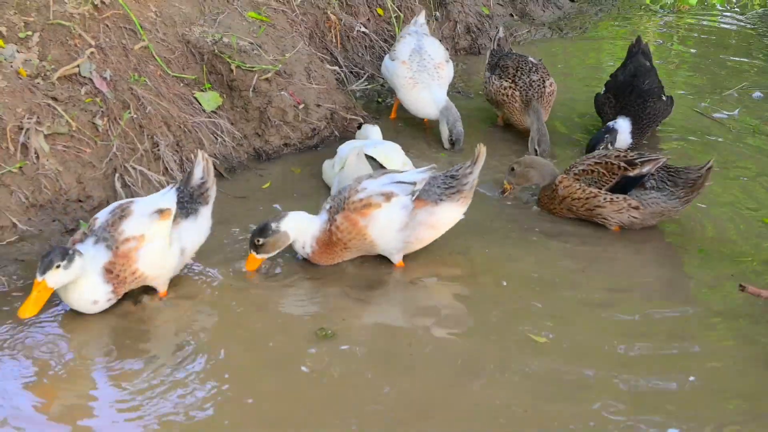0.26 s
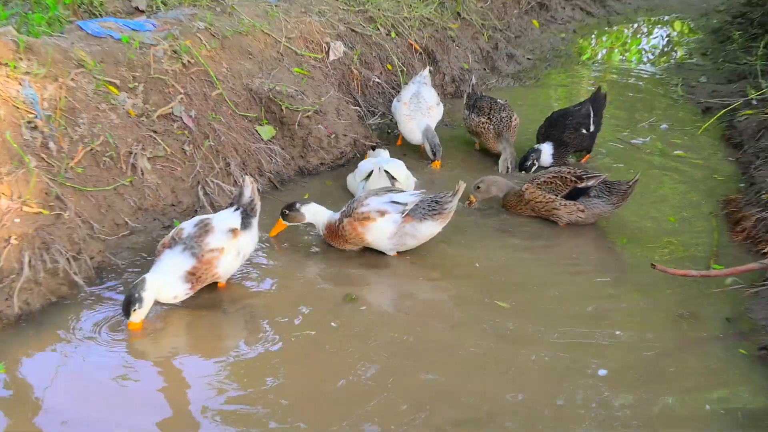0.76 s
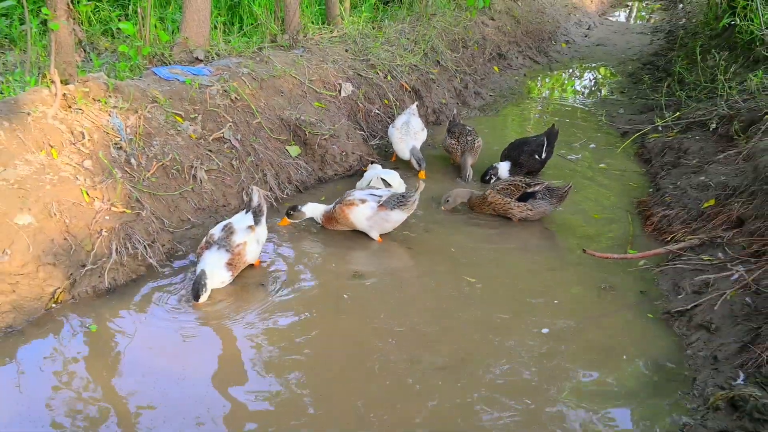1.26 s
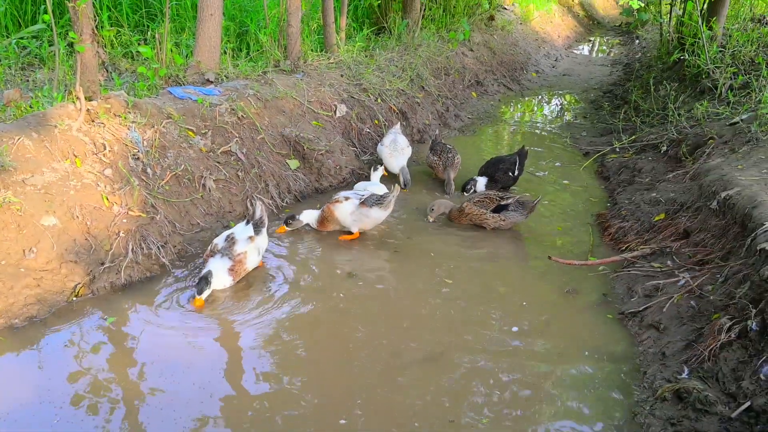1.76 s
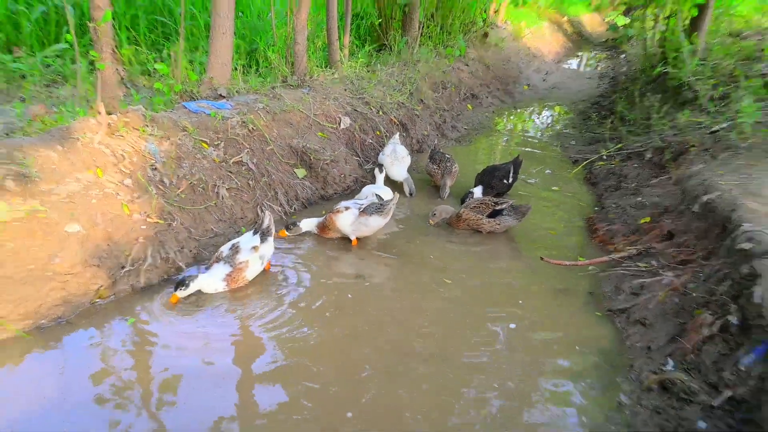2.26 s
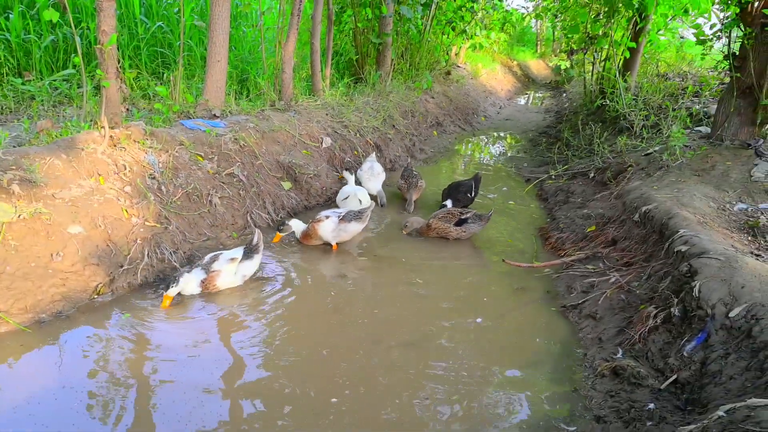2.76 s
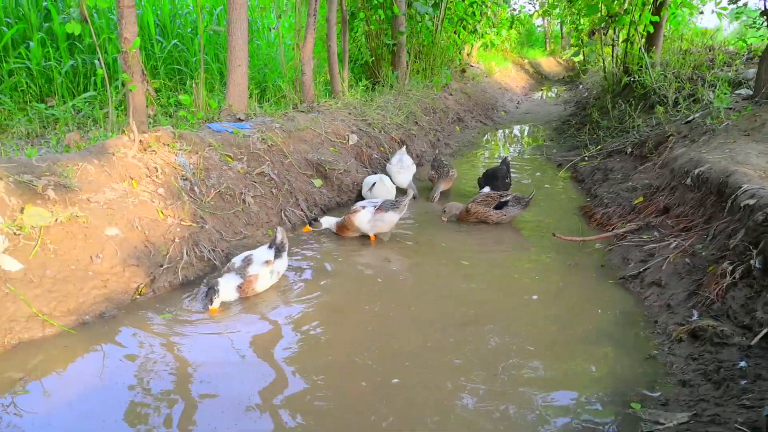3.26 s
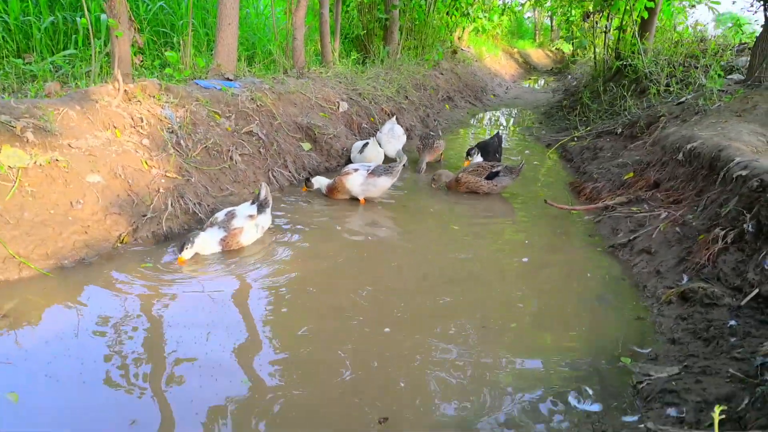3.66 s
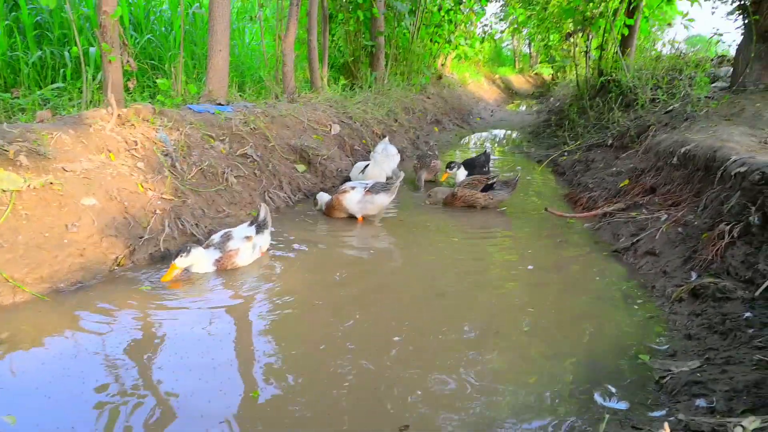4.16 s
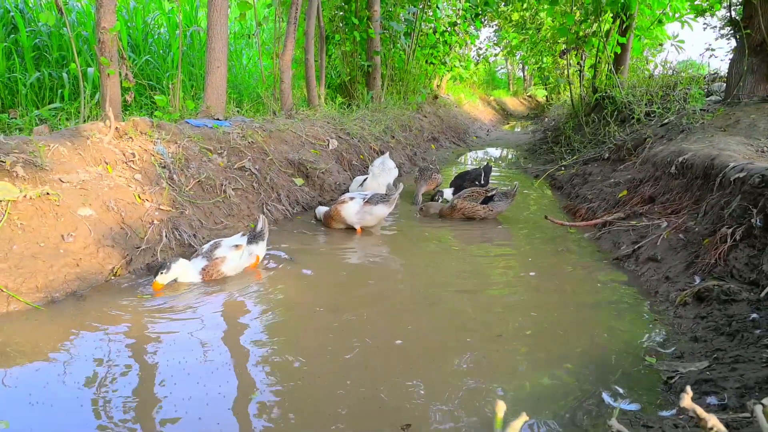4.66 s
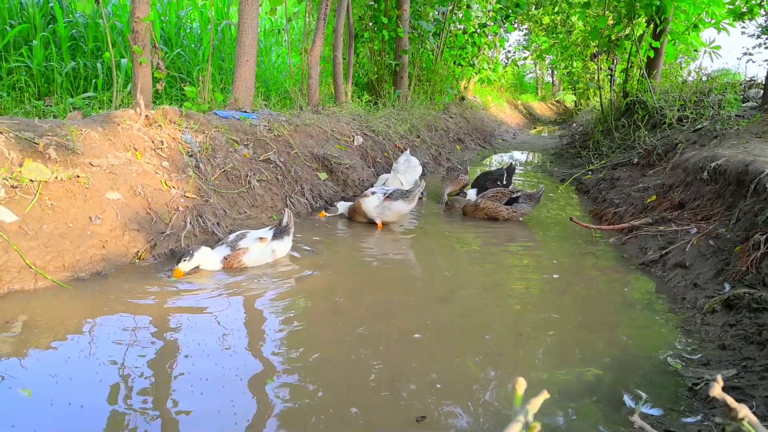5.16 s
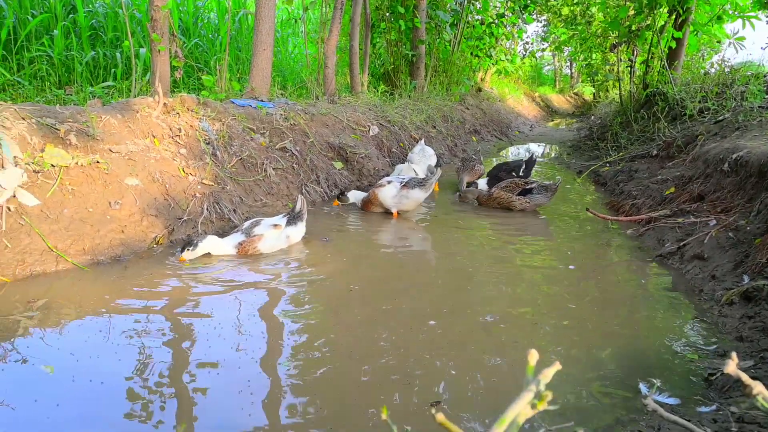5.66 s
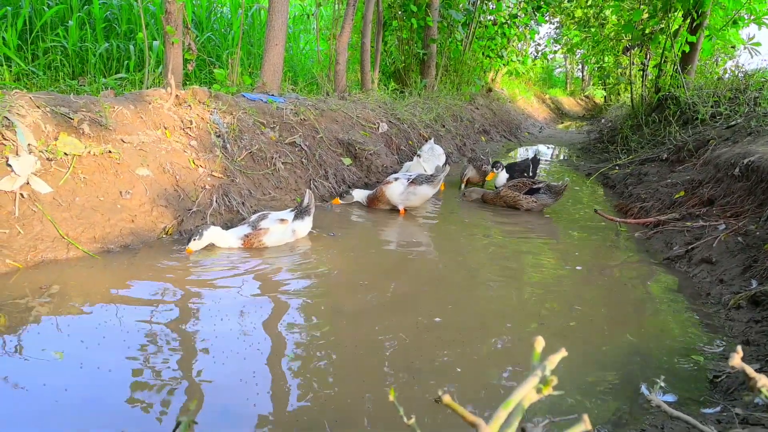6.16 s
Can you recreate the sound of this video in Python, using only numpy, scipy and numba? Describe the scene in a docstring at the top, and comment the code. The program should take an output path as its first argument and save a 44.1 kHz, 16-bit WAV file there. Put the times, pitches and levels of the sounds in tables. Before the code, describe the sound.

Outdoors beside a muddy ditch, heard in stereo by a phone a few metres from dabbling ducks. From the start, small birds chirp several times a second, quick falling notes and thin rising whistles, louder on the right and softened by short echoes. Water gurgles gently, swelling around 0.6-1.1 s with bill ticks and a plop. A cricket throbs faintly from 0.3 to 1 s, and cicadas shimmer high over a faint distant engine that fades after about 3 s. After a lull, a sharp cluster of ticks, plops and spray comes at 2.3-2.6 s. A crackling splash breaks at 3.7 s, then one duck quacks very faintly and sags away from 4.3 s. Water is quieter around 5-6 s, while arched chirps continue and the cricket returns weakly at 5.6 s. From 6.2 s, another splash, bright ticks and plops close the scene.

```python
"""Ducks dabble in a muddy ditch a few metres from a phone: bills tick, bubbles plop, water sloshes.
Water sounds are many short ringing tones (bubbles, drops) and small bursts of noise (ticks).
Small birds, louder on the right, chirp and whistle in gliding tones blurred by echoes.
Cicadas (narrow noise) and a cricket (a throbbing tone) sing far off, over a distant engine and leaves.
Later, sheets of water crackle up and one duck quacks faintly, in a few overtones."""
import sys
import numpy as np
from scipy import signal
from scipy.io import wavfile
from scipy.ndimage import uniform_filter1d
from numba import njit

SR = 44100
rng = np.random.default_rng(int(sys.argv[2]) if len(sys.argv) > 2 else 0)


def put_to_file(sound):
    """Save the sound as 16-bit audio at rate SR, in the file named by the first command-line argument."""
    columns = np.atleast_2d(sound).T  # one column per channel
    safe = np.clip(columns, -1, 1)
    whole_steps = np.round(safe * 32767)
    wavfile.write(sys.argv[1], SR, whole_steps.astype(np.int16))


N = 282681
T = np.arange(N) / SR
PORT_LAG = 6  # samples by which the left port hears the birds late
DUCK_PAN_DB = -2  # left minus right


def undb(db):
    """Turn decibels into a plain amplitude factor."""
    return 10 ** (np.asarray(db) / 20)


def level(x, db):
    """Scale a sound so its average (RMS) level is db."""
    return x * undb(db) / np.sqrt(np.mean(x ** 2))


def curve(table):
    """Join the points of each table column with straight lines over time."""
    s, *columns = np.transpose(table)
    return [np.interp(T, s, c) for c in columns]


def band(x, lo_hz, hi_hz, order=2):
    """Keep only the pitches between two limits."""
    edges = [lo_hz, min(hi_hz, .45 * SR)]
    return signal.sosfilt(signal.butter(order, edges, "band", fs=SR, output="sos"), x)


def walk(rate):
    """A random level that slides to a new value rate times a second, with a spread near 1."""
    k = int(SR / rate)
    held = np.repeat(rng.standard_normal(N // k + 1), k)
    return uniform_filter1d(held, k)[:N]


def fade(t, t60):
    """Die away by 60 dB in t60 seconds."""
    return np.exp(-np.log(1000) * t / t60)


def add(out, s, x):
    """Mix a short sound into out at s seconds."""
    i = int(s * SR)
    out[i:i + len(x)] += x[:N - i]


@njit
def grains(start, hz, cycles, size, glide, count):
    """Sines that swell for three cycles and decay, the pitch climbing by the share glide over the ring."""
    out = np.zeros(count)
    for k in range(len(start)):
        n, phase = int(3 * cycles[k] / hz[k] * SR), 0.
        for i in range(min(n, count - start[k])):
            phase += 2 * np.pi * hz[k] * (1 + glide * i / n) / SR
            swell = np.sin(np.pi / 2 * min(1., i * hz[k] / SR / 3)) ** 2
            out[start[k] + i] += size[k] * np.sin(phase) * np.exp(-7 * i / n) * swell
    return out


def place(x, pan_db, wet_db, t60, rise_s, lag=0):
    """Direct sound at two ports, plus scattered echoes whose pattern shifts as the animals move."""
    t, wet = np.arange(int(.35 * SR)) / SR, 0
    # two echo patterns take turns, three rounds a second
    for share in (np.cos, np.sin):
        spikes = np.prod(rng.standard_normal((2, 2, len(t))), axis=0)
        echo = spikes * fade(t, t60) * np.minimum(t / rise_s, 1)
        # low echoes are alike at both ports
        echo[1] = band(echo[0], 17.0, 760, order=1) + band(echo[1], 710, 20000, order=1)
        echo /= np.sqrt(np.sum(echo ** 2, axis=1))[:, None]
        turned = x * share(2 * np.pi * 3 * T)
        wet = wet + signal.oaconvolve(turned[None], echo, axes=1)[:, :N]
    direct = np.array([np.roll(x, lag), x])
    balance = undb(np.reshape([pan_db, -pan_db], (2, -1)) / 2)
    return (direct + undb(wet_db) * wet) * balance


# stirred water, before random surges and echoes: [t/s, slosh level/dB, spray level/dB], levels relative
STIRRED_WATER = [(0, -65, -76.5), (.25, -69, -81), (.62, -58.5, -68), (1., -64, -64.5), (1.55, -66, -78.5),
                 (1.72, -70.5, -86), (2.15, -77, -83), (2.42, -61, -56), (2.6, -68, -68), (2.95, -73, -95),
                 (3.58, -77.5, -77), (3.78, -66, -67), (4.08, -79.5, -68.5), (4.4, -61.5, -76),
                 (4.95, -82.5, -69.5), (5.6, -100, -84.5), (6.14, -77.5, -70.5), (6.41, -57.5, -63)]
# bubble size changes as the mud is worked: [t/s, typical f/Hz]
BUBBLE_PITCH = [(0, 1377), (.7, 1610), (1.4, 1594), (2.9, 1145), (4.4, 1450), (4.8, 834), (6.41, 1355)]


def slosh():
    """Many small bubbles ring in the churned mud, with fine spray crackling above them."""
    slosh_db, spray_db = curve(STIRRED_WATER)
    when, size = rng.random((7000, 2)).T
    start = (when * N).astype(int)
    hz = curve(BUBBLE_PITCH)[0][start] * np.exp(0.333 * rng.standard_normal(len(when)))
    loud = hz * undb(np.minimum(-3.5 * np.log(size), 13.))  # few are big
    bubbles = grains(start, hz, np.full(len(hz), 6.55), loud, 0.27, N)

    when, pitch, size = rng.random((20000, 3)).T
    drop_db = np.minimum(-3.8 * np.log(size), 21.) + 9. * pitch
    drop_hz = 2500 * 6.6 ** pitch
    spray = grains((when * N).astype(int), drop_hz, np.full(len(pitch), 2.5), undb(drop_db), 0., N)

    wavelets = level(band(rng.standard_normal(N), 297, 790), -19.)  # they lap underneath
    water = level(bubbles, 2.5) + wavelets
    wash = water * undb(slosh_db + 2.2 * walk(12))
    wash = wash + level(spray, 1.7) * undb(spray_db + 7.4 * walk(14))
    return place(wash, DUCK_PAN_DB, wet_db=1.0, t60=0.088, rise_s=0.00078, lag=PORT_LAG // 2)


# lower and higher cicada chorus, before random flicker: [t/s, level/dB]
LOW_CICADAS = [(0, -63.5), (3, -70), (6.41, -70)]
HIGH_CICADAS = [(0, -61), (1.15, -81), (1.6, -71.5), (2.1, -86), (2.85, -64), (3.6, -79), (4.4, -66.5),
                (5.3, -79), (6.41, -71)]


def cicadas():
    """Each chorus is narrow noise about a centre pitch that sways every 1.6 s."""
    out = np.zeros((2, N))
    for table, hz, sway_hz, width_hz in [(LOW_CICADAS, 7740, 150, 380), (HIGH_CICADAS, 10290, 60, 330)]:
        phase = 2 * np.pi * np.cumsum(hz - sway_hz * np.cos(2 * np.pi * T / 1.6)) / SR
        lowpass = signal.butter(4, width_hz, fs=SR, output="sos")
        for side in out:
            swing = signal.sosfilt(lowpass, rng.standard_normal((2, N)))
            chorus = swing[0] * np.cos(phase) + swing[1] * np.sin(phase)
            side += level(chorus, 0) * undb(curve(table)[0] + 5.2 * walk(19))
    return out


# a far engine, the whine before random flicker: [t/s, rumble level/dB, whine level/dB]
ENGINE = [(0, -74.5, -81.5), (.8, -71, -80), (1.5, -82.5, -85), (2.4, -73, -95.5), (3.3, -87, -93.5),
          (6.41, -83, -95)]


def engine():
    """A far engine: low rumbling noise and a steady 393 Hz whine."""
    rumble_db, whine_db = curve(ENGINE)
    whine = np.sqrt(2) * np.sin(2 * np.pi * 393 * T) * undb(whine_db + 2.2 * walk(16))
    rumble = level(band(rng.standard_normal(N), 73.8, 99, order=1), 0) * undb(rumble_db)
    return rumble + whine


# tone balance of the background: [f/Hz, relative level/dB per Hz]
AIR_BALANCE = [(25, -10.5), (87, -3.5), (2000, -27), (3430, -1.5), (4490, -17), (7710, -14.5), (10400, -42),
               (16000, -50)]
AIR_DB = -69  # average level of the whole background


def air():
    """Distant rumble and leaves: noise in half-octave bands, the bass more alike at both ports."""
    out, swell, (f, density_db) = 0, walk(0.86), np.transpose(AIR_BALANCE)
    for hz in 30 * 2 ** np.arange(0, 9.1, .5):
        mid, side = band(rng.standard_normal((2, N)), hz / 1.19, hz * 1.19, order=1)
        db = np.interp(np.log(hz), np.log(f), density_db) + 1.1 * swell + 5.6 * walk(2.026)
        width = np.clip(hz / 1200, .2, 1)
        out = out + undb(db) * (mid + width * side * np.array([[1], [-1]]))
    return level(out, AIR_DB)


FALL_BEND = 1.6  # above 1 the glide after the knee gathers speed


def note(out, s, length, hz, knee, peak, db, warble):
    """A sine gliding through three pitches with a quick uneven warble, loudest at the share peak."""
    u = np.linspace(0, 1, int(length * SR))
    late = np.maximum(u - knee, 0) / (1 - knee)
    bent = np.minimum(u, knee) + (1 - knee) * late ** FALL_BEND
    wobble = uniform_filter1d(np.repeat(rng.standard_normal(60), 150), size=150)[:len(u)]
    glide = uniform_filter1d(np.interp(bent, [0, knee, 1], hz), size=300)
    pitch = glide * (1 + warble * wobble)
    swell = np.interp(u, [0, peak, 1], [0, 1, 0])
    shape = .45 * np.sqrt(swell) + swell ** 3  # a thin lead-in and a bright core
    add(out, s, 2 * undb(db) * shape * np.sin(2 * np.pi * np.cumsum(pitch) / SR))


# falling chirps: [t/s, length/s, knee f/Hz, end f/Hz, relative level/dB]
FALLING_CHIRPS = [(0.109, 0.094, 3320, 2070, -42.5), (0.167, 0.08, 3363, 2284, -48.5),
                  (0.443, 0.11, 3500, 2020, -47), (0.496, 0.097, 3434, 2164, -46),
                  (0.837, .11, 3505, 3050, -44), (0.841, 0.031, 2576, 2210, -47.5),
                  (1.097, 0.064, 2990, 1860, -52.5), (1.16, 0.11, 3546, 2190, -50),
                  (1.358, 0.12, 3186, 2150, -50.5), (1.481, 0.087, 3240, 2640, -56.5),
                  (1.538, 0.086, 3470, 3100, -59), (0.65, 0.062, 3700, 3120, -66),
                  (1.762, 0.065, 3360, 2280, -49.5), (1.835, 0.056, 3000, 2160, -50),
                  (1.889, 0.075, 3666, 3080, -49), (2.052, 0.083, 3534, 3050, -55),
                  (2.147, 0.065, 3613, 2200, -47), (2.433, 0.054, 3380, 3000, -53),
                  (2.614, 0.065, 3760, 2400, -53), (2.665, .12, 3210, 3050, -52.5),
                  (2.775, 0.042, 3290, 2610, -49), (2.847, 0.055, 3540, 3040, -50.5),
                  (3.077, 0.07, 3080, 2080, -55), (3.136, 0.087, 3494, 2640, -53),
                  (3.217, 0.073, 3300, 2260, -55.5), (3.398, 0.092, 3496, 1900, -51),
                  (3.713, 0.058, 3390, 2510, -46.5), (3.868, 0.072, 3950, 3180, -61),
                  (4.012, 0.073, 3350, 2250, -50), (4.078, 0.064, 3897, 3600, -60),
                  (4.164, .06, 3640, 3190, -60), (4.341, .13, 3380, 2430, -50.5),
                  (4.665, 0.12, 3638, 2390, -49.5), (4.98, 0.05, 2980, 2370, -55.5),
                  (5.031, .14, 3667, 3110, -51), (5.212, 0.045, 3580, 2830, -49),
                  (5.42, 0.091, 3660, 2730, -53.5), (5.694, 0.097, 3647, 2940, -51.5),
                  (5.958, 0.091, 3515, 2050, -50.5), (6.258, 0.035, 3330, 2980, -54)]
# arched chirps, up and then down: [t/s, top f/Hz, relative level/dB]
ARCHED_CHIRPS = [(0.253, 4090, -58.5), (0.575, 4110, -52), (0.826, 4120, -51), (2.229, 4235, -59.5),
                 (4.797, 3770, -59), (5.317, 3910, -49.5), (5.574, 3854, -47), (5.821, 3845, -49.5),
                 (6.09, 3810, -50.5)]
# the phone turns slowly: [t/s, left minus right level/dB]
BIRD_PAN = [(0, -6.5), (3., -7), (6.41, -5.5)]
CHIRP_START = 1.1  # start pitch over knee pitch
CHIRP_KNEE, CHIRP_PEAK = .6, 0.78  # shares of the length
UPPER_VOICE, UPPER_VOICE_DB = 1.12, -11.5  # second half of the syrinx: pitch ratio, level
ARCH_S, ARCH_TOP = 0.1, 0.46  # length; where the top comes, as a share of it


def chirps():
    """Two-voiced chirps hold and drop, others arch; all flutter, and a few trunks repeat them plainly."""
    falls = np.zeros(N)
    for s, length, knee_hz, end_hz, db in FALLING_CHIRPS:
        lower = [CHIRP_START * knee_hz, knee_hz, end_hz]
        upper = UPPER_VOICE * np.array([knee_hz, knee_hz, end_hz])
        note(falls, s, length, lower, CHIRP_KNEE, CHIRP_PEAK, db, 0.0097)
        note(falls, s, length, upper, CHIRP_KNEE, CHIRP_KNEE, db + UPPER_VOICE_DB, 0.017)
    for s, top_hz, db in ARCHED_CHIRPS:
        note(falls, s, ARCH_S, top_hz * np.array([.83, 0.99, .64]), ARCH_TOP, 0.62, db, 0.01)
    falls = falls * undb(6.5 * walk(200))
    repeats = sum(undb(db) * np.roll(falls, int(s * SR)) for s, db in [(.024, -9), (.049, -11)])
    pan_db = curve(BIRD_PAN)[0]
    return place(falls + repeats, pan_db, wet_db=-3.5, t60=0.2, rise_s=0.005, lag=PORT_LAG)


# rising whistles: [t/s, length/s, held f/Hz, relative level/dB]
RISING_WHISTLES = [(0.12, 0.071, 4930, -51.5), (0.693, 0.087, 5470, -56.5), (0.78, 0.12, 5110, -50),
                   (1.225, 0.034, 1890, -51), (1.375, 0.026, 1870, -54.5), (2.775, 0.092, 5000, -57),
                   (3.206, 0.065, 5315, -58.5), (3.285, 0.072, 5230, -50), (3.644, 0.085, 5020, -49.5),
                   (4.435, 0.07, 4835, -52), (4.918, 0.081, 4780, -51), (5.865, 0.057, 5530, -58.5),
                   (5.96, 0.077, 5250, -52)]
WHISTLE_KNEE = .62  # share of the length where the climb levels off


def whistles():
    """Bird whistles climb, level off and flutter lightly."""
    rises = np.zeros(N)
    for s, length, held_hz, db in RISING_WHISTLES:
        note(rises, s, length, held_hz * np.array([.82, 1., 1.02]), WHISTLE_KNEE, 0.43, db, 0.0245)
    rises = rises * undb(0.63 * walk(300))
    return place(rises, -0.11, wet_db=0.68, t60=0.29, rise_s=0.016, lag=PORT_LAG)


# cricket songs: [start t/s, end t/s, level/dB before fades and echoes]
CRICKET_SONGS = [(0.307, 1.022, -63.5), (5.618, 6, -69)]


def cricket():
    """A steady high tone above a rasp of noise, throbbing about 58 times a second."""
    tone = np.sin(2 * np.pi * 9683 * T) * undb(0.83 * walk(60))
    rasp = level(band(rng.standard_normal(N), 9260, 9620), -1.2)
    beat = np.cos(2 * np.pi * np.cumsum(58.0 + 8.34 * walk(24)) / SR)
    throb = (1 + 0.61 * beat) * (tone + rasp) * undb(3.3 * walk(120))
    out = np.zeros((2, N))
    for start, end, db in CRICKET_SONGS:
        gate = np.clip(np.minimum(T - start, end - T) / 0.1, 0, 1)
        out += place(level(throb, db) * gate, -0.62, wet_db=0., t60=0.38, rise_s=0.0014)
    return out


# bills snapping shut and drops landing: [t/s, peak level/dB before echoes, centre f/Hz]
BILL_TICKS = [(0.446, -32.5, 11400), (0.6274, -39, 8400), (0.693, -41, 11100), (0.838, -40, 11700),
              (0.9594, -32.5, 5840), (1.0272, -31, 6030), (1.0755, -35.5, 10800), (1.0932, -35, 6440),
              (1.327, -29.5, 16200), (1.8054, -36, 4680), (1.905, -42, 12500), (2.301, -38, 5260),
              (2.365, -34, 12050), (2.3914, -25, 4500), (2.455, -28, 5140), (3.6223, -37.5, 5850),
              (5.019, -43.5, 14500), (5.186, -42.5, 6640), (5.207, -48, 13400), (6.17, -38.5, 8000),
              (6.2391, -25, 5330), (6.3014, -36.5, 5200), (6.3652, -24, 6700)]


def ticks():
    """Each tick is a very short burst of noise about its centre pitch."""
    out, t = np.zeros(N), np.arange(300) / SR
    for s, db, hz in BILL_TICKS:
        burst = rng.standard_normal(len(t)) * t * np.exp(-t / 0.00074)
        burst = band(burst, 0.79 * hz, 1.166 * hz)
        add(out, s - .0005, undb(db) * burst / np.abs(burst).max())
    return out


# bubbles bursting under the bills: [t/s, relative level/dB, f/Hz]
BUBBLE_PLOPS = [(0.954, -28.5, 2450), (2.033, -44, 1580), (2.235, -35.5, 2570), (2.27, -35, 2550),
                (2.402, -25, 1070), (2.28, -42, 1240), (2.423, -41, 1100), (2.455, -32, 2500),
                (2.587, -31.5, 2410), (3.128, -36.5, 2240), (3.32, -40, 2820), (3.687, -39.5, 2470),
                (3.751, -30, 1104), (3.791, -36.5, 1000), (3.894, -41, 1600), (4.208, -45.5, 1200),
                (4.585, -43.5, 720), (6.312, -40.5, 1130), (4.323, -32.5, 1630), (4.54, -45.5, 2480),
                (4.967, -44.5, 1900), (6.365, -23, 2250), (6.367, -23.5, 1180)]


def plops():
    """Each bursting bubble rings for a few cycles with a slightly rising pitch."""
    s, db, hz = np.transpose(BUBBLE_PLOPS)
    start = (s * SR - 2 * SR / hz).astype(int)  # two cycles early, to leave room for the swell
    return grains(start, hz, 1.14 + hz / 900, 7.46 * undb(db), 0.033, N)


def dabbling():
    """Ticks and plops from the ducks' bills; the banks throw both back."""
    return place(ticks() + plops(), DUCK_PAN_DB, wet_db=-1.0, t60=0.22, rise_s=0.001)


# sheets of water thrown up: [t/s, relative level/dB]
WATER_SHEETS = [(3.661, -53.5), (3.74, -43.5), (6.233, -47)]
SPLASH_RISE_S, SPLASH_T60_S = 0.0036, 0.37
SPLASH_HZ = (1690, 14050)  # lowest and highest starting pitch of the droplets


def splashes():
    """A dense crackle of droplets that bursts out and dies away."""
    size = sum(undb(db) * np.clip((T - s) / SPLASH_RISE_S, 0, 1) * fade(np.abs(T - s), SPLASH_T60_S)
               for s, db in WATER_SHEETS)
    when, pitch, big = rng.random((6000, 3)).T
    lo, hi = SPLASH_HZ
    hz = lo * (hi / lo) ** pitch
    loud = undb(np.minimum(-4.5 * np.log(big), 18.))
    drops = grains((when * N).astype(int), hz, np.full(len(hz), 4.5), loud, 0.69, N)
    return place(size * level(drops, 0), -1.0, wet_db=1.0, t60=0.047, rise_s=0.0038, lag=PORT_LAG)


QUACK_S, QUACK_HZ, QUACK_T60_S, QUACK_DB = 4.285, 267, 0.73, -58.5  # relative level
QUACK_HOLD_S, QUACK_SAG_PER_S = .14, 1.0


def quack():
    """A faint murmur, held then sagging: only overtones near the duck's throat resonance carry."""
    t = np.maximum(T - QUACK_S, 0)
    hz = QUACK_HZ * np.exp(-QUACK_SAG_PER_S * np.maximum(t - QUACK_HOLD_S, 0))
    phase = 2 * np.pi * np.cumsum(hz) / SR
    # overtone number and level; the flicker deepens with time
    tone = sum(np.sin(k * phase) * undb(db + (4.0 + 8 * t) * walk(70).clip(-2, 1))
               for k, db in [(4, 4.5), (5, 4.0), (6, 9.0)])
    murmur = undb(QUACK_DB) * tone * np.minimum(t / 0.019, 1) * fade(t, QUACK_T60_S)
    return place(murmur, -1.1, wet_db=2.1, t60=0.23, rise_s=0.0025)


def scene():
    """All the sounds together, at two ports."""
    background = cicadas() + engine() + air()
    animals = chirps() + whistles() + cricket() + quack()
    return slosh() + background + animals + dabbling() + splashes()


def record(dry):
    """The phone cuts the top, above 15.8 kHz."""
    return signal.sosfilt(signal.ellip(10, .2, 60, 15800, fs=SR, output="sos"), dry)


dry = scene()
out = record(dry)
put_to_file(out)
```